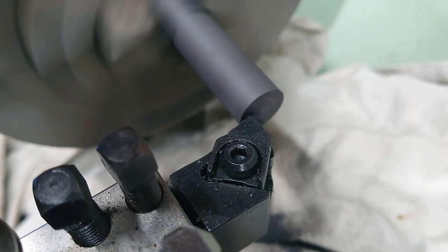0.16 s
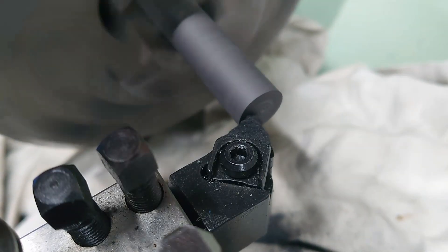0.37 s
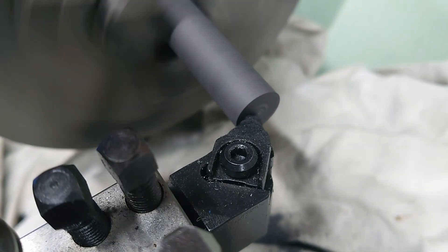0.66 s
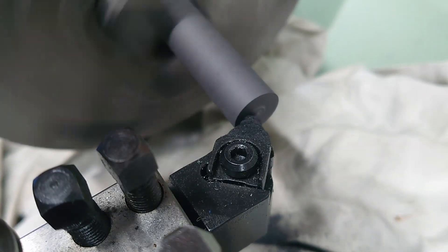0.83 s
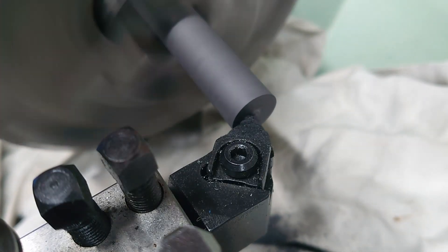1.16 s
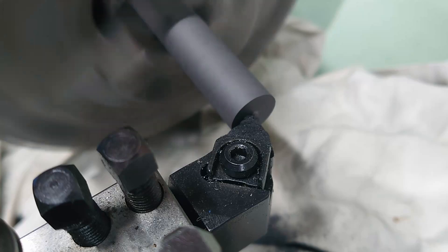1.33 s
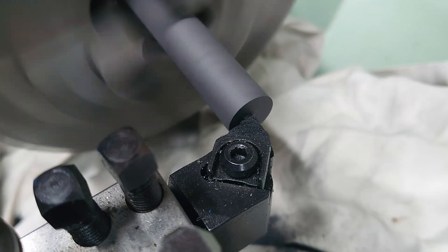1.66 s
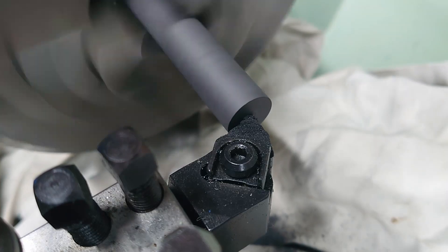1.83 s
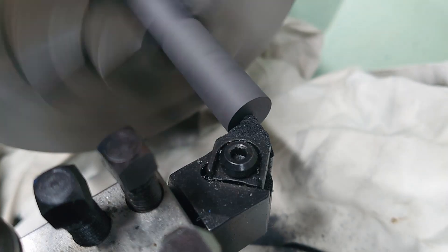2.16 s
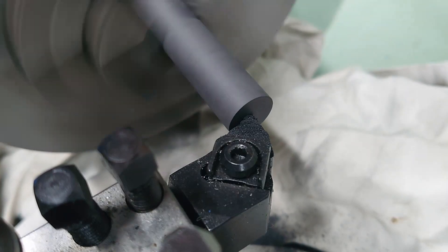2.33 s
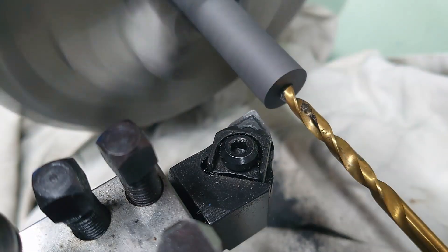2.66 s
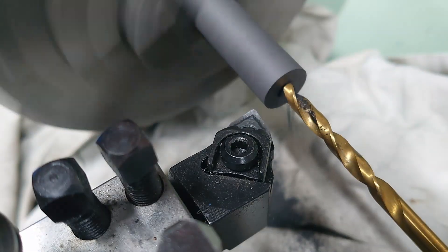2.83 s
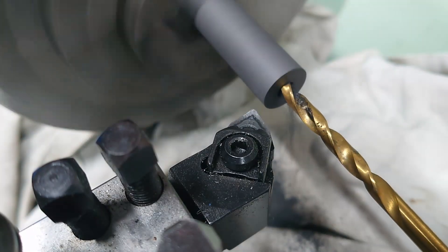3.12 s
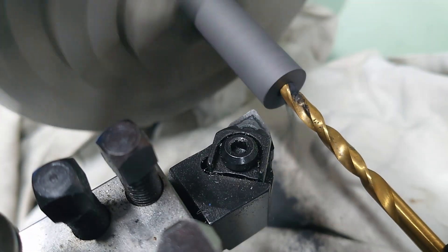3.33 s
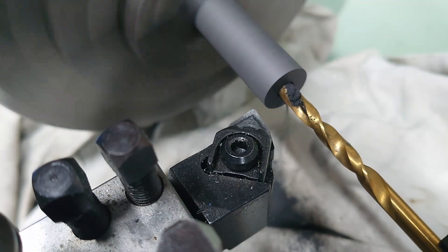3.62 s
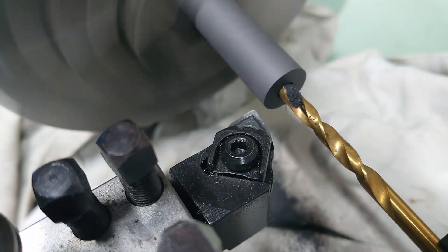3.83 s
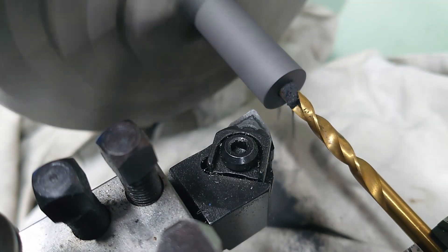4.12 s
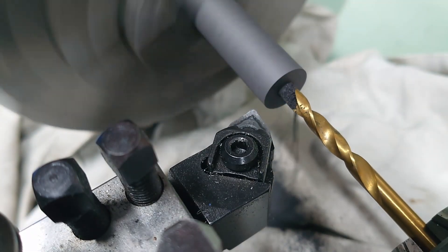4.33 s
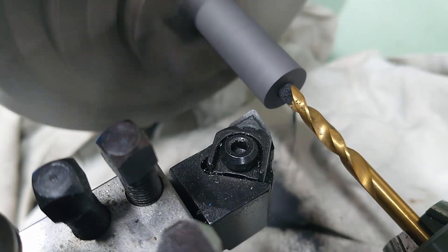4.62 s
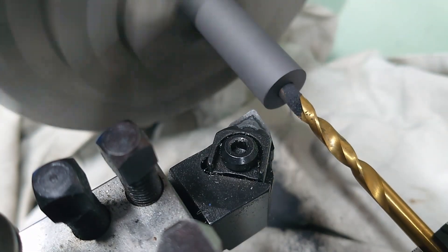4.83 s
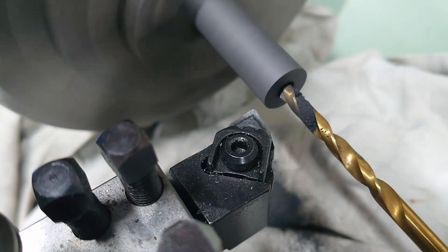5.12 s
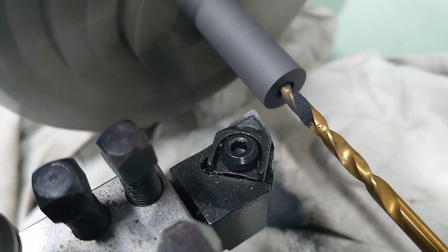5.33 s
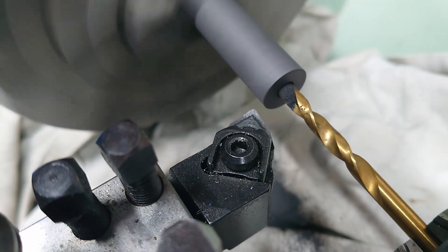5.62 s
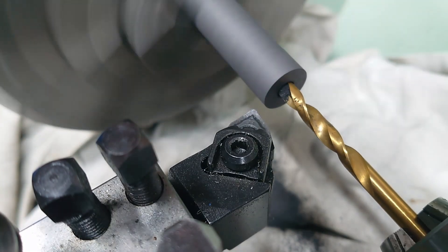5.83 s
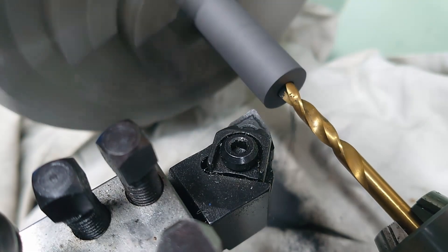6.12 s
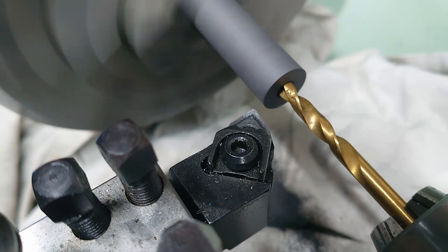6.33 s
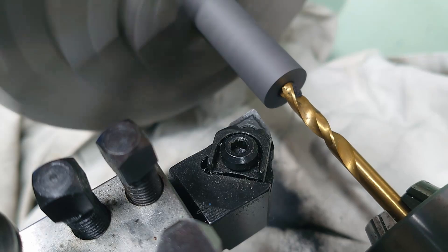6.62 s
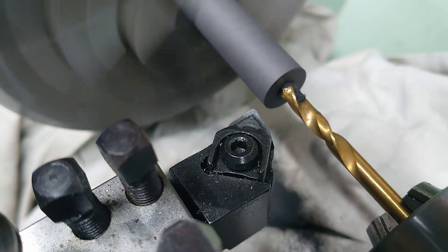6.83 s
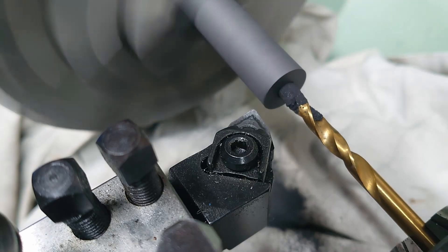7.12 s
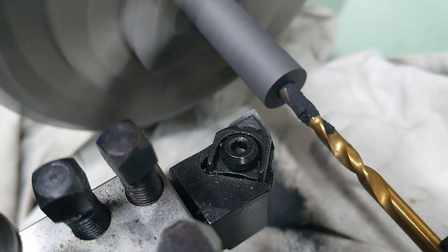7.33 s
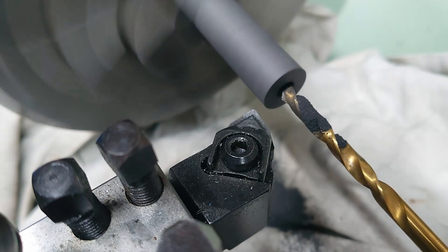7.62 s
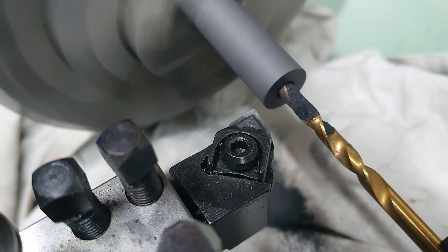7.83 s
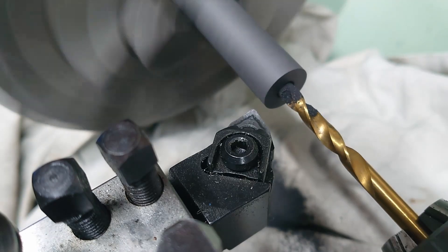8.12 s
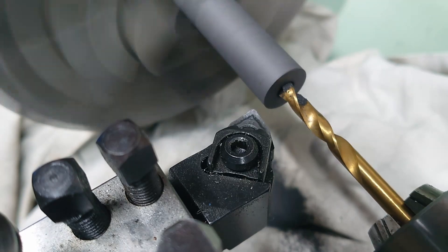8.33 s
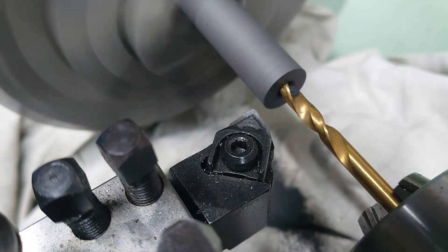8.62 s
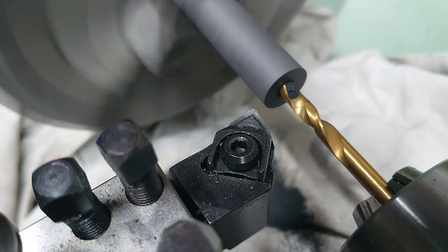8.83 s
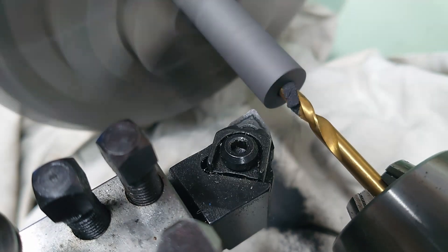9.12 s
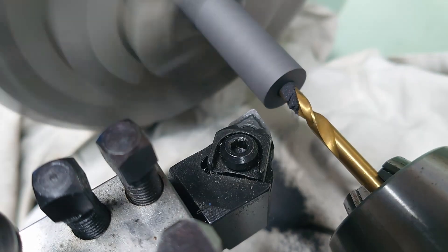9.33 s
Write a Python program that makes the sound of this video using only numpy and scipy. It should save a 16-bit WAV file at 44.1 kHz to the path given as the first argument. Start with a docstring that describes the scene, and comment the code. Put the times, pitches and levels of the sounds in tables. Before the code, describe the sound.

Close stereo sound of a bench lathe: first a firm mid-pitched whine, throbbing noise and a fluttering metallic rasp from facing a rod, fading as the cut shrinks. Around two and a half seconds the motor revs up, heard a little further away. Rougher whirring, casing rumble and airy hiss continue under short, very high drill squeaks, dry chip snaps and light crackle, still running at the end.

```python
"""On a workbench, a small geared metal lathe is heard close in stereo, facing a rod and then drilling it.
First the gears whine on a steady note, built from tooth-contact tones, while noise and squeal swing with each cut.
Then, a little further off, the motor is turned up: a looser mesh tone joins casing-coloured rumble and hiss.
The drill squeaks in short swells of its high modes, and chips tick as bursts of slips ring short modes."""
import sys
import numpy as np
from scipy import signal
from scipy.fft import rfft, irfft, next_fast_len
from scipy.io import wavfile

SR = 44100
rng = np.random.default_rng(int(sys.argv[2]) if len(sys.argv) > 2 else 0)


def materialize(psi):
    """Save the field psi as 16-bit PCM at rate SR to the path in sys.argv[1].

    A 1-D psi becomes a single channel; in a 2-D psi each row is a channel.
    """
    bounded = np.clip(np.atleast_2d(psi).T, -1, 1)
    quanta = np.round(bounded * 32767).astype(np.int16)
    wavfile.write(sys.argv[1], SR, quanta)


N = 417627
TIME = np.arange(N) / SR

# Motor speed as tooth contacts: (time [s], mesh rate [Hz])
MOTOR_SPEED = [(2.49, 695.85), (2.525, 716), (2.54, 845), (2.6, 850), (2.655, 930), (2.715, 955),
               (2.745, 1040), (2.95, 1048), (3.3, 1051.5), (9.47, 1054)]
# Slow gear tones: (times per pinion turn, times per wheel turn, level [dB], left-right [dB], left lead [rad])
SLOW_GEAR_TONES = [(1, 0, -24, 8, 2.1), (0, 3, -38, 20, 1.3), (0, 11, -31, -3, 0), (0, 13, -24, 1, 0),
                   (0, 14, -32, -2, -.7), (0, 20, -31, -9, .5), (0, 21, -29, -9, .2), (0, 22, -28, -4, 0),
                   (0, 24, -32, -7, .2), (0, 25, -26, -7, -.5), (0, 33, -27, -4, -.5), (23, 0, -17, -3, 0),
                   (0, 37, -24, -1, -.5), (24, 0, -14, -2, -.5), (0, 38, -24, -6, -.4), (25, 0, 0, -4, -.3),
                   (0, 40, -11, -2, -.3), (26, 0, -24, -4, 0), (0, 41, -17, -5, .3), (0, 42, -12, -11, -.9),
                   (0, 43, -26, -2, -1.7), (0, 49, -28, -2, -1), (0, 52, -26, -2, -1),
                   (50, 0, -18, -4, -1.8), (50, 1, -29, -2, -.4)]
# Fast gear tones: (spindle orders off the mesh, level [dB], left-right [dB], left lead [rad])
FAST_GEAR_TONES = [(-1, -10, -20, 1.2), (0, 0, -6, 2.3), (1, -15, 2, -2.3), (2, -15, 20, 1.8),
                   (4, -15, 15, 2.8), (-2, -16, -4, 2.8)]
# Mesh tone while drilling: (time [s], level [dB])
FAST_MESH_LEVEL = [(2.52, -55), (2.56, -41), (2.6, -28), (2.65, -35), (2.685, -37), (2.72, -34),
                   (2.755, -34.5), (2.82, -40), (2.89, -34.5), (3.0, -33), (3.7, -34.5), (4.8, -35.5),
                   (5.8, -38), (6.1, -41), (7.2, -40.5), (9.47, -40.5)]
# Casing resonances, silent below 0 dB: (centre [Hz], width [Hz], slow boost [dB], fast boost [dB])
CASING_MODES = [(215, 40.7, -1.5, 13.9), (393, 31.6, 7.5, 11), (540, 180, -2, 0.96), (690, 112, 10, 1.7),
                (740.3, 18.7, 14, 10.1), (865, 12, -12, 9.5), (980, 64, 0.5, 11.6), (1091, 68, 3.5, 17.1),
                (1172, 32, -1.5, 11.5), (1215, 20, 1, 8), (1272, 30, 4.5, 10.8), (1360, 65, 4.5, 0.63),
                (1630, 34, -2, 5.4), (2023, 16.8, 14, 12.8), (3514, 27, 8.5, 7.2), (3826, 22, 8, 6.8),
                (4070, 21, 7, 4), (4730, 27, 8, 9.5), (5800, 710, -4, 5.4), (6340, 225, 12, 6),
                (6760, 40, 15.5, 11.4), (7250, 110, -5, 4.5), (8200, 28, 4, 2.2), (9900, 78, -2, 1.7)]
# Noise colours of the slow running, the cut, the rumble, the hiss and the top hiss:
# (frequency [Hz], relative density [dB per Hz])
SLOW_COLOUR = [(30, -16), (70, -5), (120, -12), (200, 4.5), (500, -0.5), (1000, 2), (1700, -7.5),
               (2800, -9.5), (5000, -12.5), (7000, -14.5), (8300, -20), (10500, -13.5), (13000, -17),
               (16000, -22)]
RASP_COLOUR = [(400, -22), (900, -14), (1500, 0), (1850, 3), (2050, 8.5), (2300, -3), (3300, -3),
               (5000, -12.5), (8500, -19), (9350, -13), (9700, -1), (10050, -11), (10500, -6),
               (11000, -12.5), (15000, -39)]
RUMBLE_COLOUR = [(25, -6), (70, -1), (120, -2.5), (300, -0.5), (600, 6), (1200, 0), (1600, -4),
                 (2500, -4.5), (3200, -71)]
HISS_COLOUR = [(1800, -28), (2600, 0), (4000, 2.5), (5300, -3.5), (7000, 1), (8300, -6), (9500, -5.5),
               (11000, -12)]
TOP_COLOUR = [(7500, -18.5), (9000, -7), (10500, -2), (12000, -2), (14000, -6.5), (16000, -6)]
# Stereo width of the noise: (frequency [Hz], side over mid [dB])
SLOW_STEREO_WIDTH = [(60, -22), (110, -4), (200, -13), (380, -6.5), (700, -1), (1290, 1.5), (2380, -0.5),
                     (4400, 1), (8120, 0.5), (15000, -1)]
FAST_STEREO_WIDTH = [(60, 20.5), (110, -22), (200, -9.5), (380, -6.5), (700, -3.5), (1290, 0.5), (2380, -1),
                     (4400, 0), (8120, -1), (15000, 0)]
# Stereo balance of the noise: (frequency [Hz], left-right [dB])
SLOW_BALANCE = [(60, 8.5), (110, 4.5), (200, -1), (380, -2), (700, -5), (1290, 0.5), (2380, 4),
                (4400, -2.5), (8120, -12), (15000, 13.5)]
FAST_BALANCE = [(60, -0.5), (110, 3), (200, -2.5), (380, -5), (700, -3), (1290, -1.5), (2380, 0),
                (4400, -2), (8120, -3.5), (15000, 7.5)]
# Two strands of tool chatter that take turns:
# (pitch [Hz], swing [Hz], level over the rasp [dB], swell at the top of the turn [dB])
CHATTER_STRANDS = [(2040, 54, 0.5, 4.5), (1876, 40, -2, -4.5)]
# Rough notes either side of the mesh: (pitch [Hz], level [dB], left-right [dB], left lead [rad])
BORE_TONES = [(998, 0, 21, -1.3), (1074, -1, 0.5, 1.86)]
# High modes of the drill: (pitch [Hz])
DRILL_MODES = [9960, 10550, 11350]
# Drill margin rubbing the bore: (time [s], level [dB], centre [Hz], length [s])
DRILL_RUBS = [(3.693, -30.5, 11370, 0.03), (3.8853, -45, 10500, .04), (4.75, -29, 10830, 0.025),
              (4.82, -34.5, 10800, .038), (4.904, -36.5, 10500, .025), (5.051, -31.5, 10640, 0.03),
              (5.134, -29, 10800, 0.031), (5.357, -34, 10540, 0.033), (7.078, -25.5, 10900, 0.027),
              (7.1449, -41, 10600, .036), (7.2097, -39, 9750, 0.017), (7.327, -29, 10530, 0.027),
              (7.394, -31, 10900, 0.042), (7.675, -42, 10400, .025), (7.7365, -42, 10000, .025),
              (8.092, -44, 9900, .022), (8.1446, -47, 10500, .025), (9.439, -44, 10550, 0.02)]
# Chips snapping: (time [s], level [dB], centre [Hz])
CHIP_SNAPS = [(3.716, -43, 4450), (3.8851, -44, 3700), (4.8434, -37, 4300), (4.991, -35, 4300),
              (5.032, -41, 4700), (5.0784, -40, 4650), (5.2684, -46, 4300), (5.666, -43, 3800),
              (5.7483, -46, 4500), (5.8306, -44, 4600), (6.6069, -44, 5000), (7.0234, -36, 5000),
              (7.208, -39, 4500), (7.3065, -37, 6500), (7.309, -42, 3900), (7.3357, -36, 4600),
              (7.3906, -41, 4300), (7.414, -38, 4500), (7.4945, -37, 4500), (7.6785, -38, 4050),
              (7.927, -41, 4400), (7.932, -41, 5800), (8.0222, -44, 4200), (8.095, -39, 4600),
              (8.2701, -45, 3600), (8.3914, -46, 4200)]
# Short modes struck by a snap: (pitch [Hz], level [dB], decay by 60 dB [s])
SNAP_MODES = [(3940, 0.5, 0.031), (4050, 3, 0.023), (4520, 6.5, 0.018), (4960, 3, 0.016), (5660, 8, 0.015),
              (6740, 10, 0.011), (9800, 4, .006)]
# Packed flutes, small chips crackle; silent where the end precedes the start: (start [s], end [s])
PACKED_SPANS = [(4.75, 5.9), (6.95, 6.2)]
# Two duller knocks: (time [s], peak [dB])
DULL_KNOCKS = [(5.1432, -37), (5.3567, -34)]
# Thin notes that wander and break up while drilling: (pitch [Hz])
THIN_PITCHES = [220, 3521, 4735, 7825, 2022]
# The same notes: (wander [Hz], level [dB], flicker [dB], left-right [dB], left lead [rad])
THIN_MOTION = [(8.01, -47.5, 0.3, 0, -0.13), (20, -61, 5.5, 5, 1.4), (28, -62, 5.5, 10, 1.5),
               (6.6, -61, 3.5, 22, -.6), (10.6, -75, -1, -15, -0.2)]
# Top hiss: (time [s], level [dB])
TOP_HISS_LEVEL = [(2.41, -62), (2.75, -50), (3.4, -47.5), (3.7, -52), (4.5, -48.5), (5.3, -53),
                  (6.0, -51.5), (8, -54.5), (9.0, -52.5), (9.47, -54.5)]
# Rotor hum, rumble and bearing hiss, each one row:
# (full-speed level [dB], change when slow [dB], drift while drilling [dB per s])
HUM_LEVEL = (-39, -16, -0.44)
RUMBLE_LEVEL = (-38, -2.1, 0.11)
HISS_LEVEL = (-45, -4.5, -0.33)

PINION_TEETH, WHEEL_TEETH, SPINDLE_RATIO = 25, 39, 76   # the ratio is tooth contacts per spindle turn
SLOW_MESH_HZ, FAST_MESH_HZ, SPEED_WANDER_HZ = 695.85, 1050, 1.5   # the wander is that of full speed
CHANGE_S = 2.403   # from here on it is heard further off
SLOW_END = round(2.85 * SR)   # last sample of the slow whine
GEAR_DB, GEAR_FAR_DB, GEAR_FADE_DB = -29, -34, -40   # whine close up, further off, its loss by full speed
WEAK_PINION_TOOTH_S, WEAK_WHEEL_TOOTH_S = 1.5784, 1.606   # a moment when each worn tooth is in mesh
# where in the mesh cycle each worn tooth pushes; a half opposes the tone
PINION_ERROR_CYCLES, WHEEL_ERROR_CYCLES = .83, .63
FACING_TURN_HZ, SQUEAL_TOP_S, SQUEAL_ROUGH_HZ = 11.7, .01, 60   # rod turns, a top of the swing, pitch jitter
RUNNING_DB, RUNNING_DB_PER_S = -37.5, -0.28   # running noise while facing
# the cut shrinks towards the centre: dB lost after 1 s, ever faster
RASP_DB, RASP_FALL_DB, RASP_FALL_POWER = -40.5, -8, 1.93
# deep in the bore, and while speeding up, the tooth timing scatters
MESH_LOOSE_S, MESH_LOOSE_CYCLES, RUN_UP_LOOSE_CYCLES = 5.6, .3, .08
LEAN_DB, LEAN_DB_PER_S = -.5, -0.01   # left-right balance of the fast running
BORE_NOTE_DB, BORE_NOTE_FULL_S, BORE_NOTE_DB_PER_S = -42.5, 6.5, 2   # grow with depth, then hold
SQUEAK_DB_PER_KHZ = -17   # modes away from the centre sing less
SQUEAK_LEAN_DB, SQUEAK_LEAN_DB_PER_S = 4, -1.8   # left at first, drifting right as the drill goes in
TICK_LEAN_DB = -8
TICK_DB_PER_OCTAVE, TICK_SCATTER_DB = -13, 2   # modes off a snap's centre are struck less, and unevenly
SNAP_S, SNAP_LOW_HZ, CRACK_DB = 0.0003, 3200, -4   # slip decay, lowest sound, dry crack over the ring
CRACKLES_PER_S, CRACKLE_DB = 40, -53   # the level is that of the softest crackle
# rumble in this band wakes only as the mesh climbs into it: cut at low speed, rise by full speed
WHINE_BAND_HZ, WHINE_BAND_SLOW_DB, WHINE_BAND_RISE_DB = (900, 1300), -13.5, 9
# extra rumble just over the mesh, against the rumble in that band, fading as drilling goes on
UPPER_BAND_HZ, UPPER_BAND_DB, UPPER_BAND_DB_PER_S = (1115, 1190), 3, -2
THUD_S, THUD_DB, THUD_HZ, THUD_T60_S = 2.25, -35.5, 68.5, .2   # level before the fade
CUTOFF_HZ = 15760


def amp(db):
    """Turn dB into gain."""
    return 10 ** (np.asarray(db) / 20)


def in_time(rows):
    """Read a (time, value) curve sample by sample."""
    times, values = np.transpose(rows)
    return np.interp(TIME, times, values)


def at_hz(points, hz):
    """Read a spectrum on a log frequency axis."""
    points = np.array(points)
    return np.interp(np.log(hz), np.log(np.maximum(points[:, 0], 1)), points[:, 1])


def drift(rate):
    """Random wander of spread 1, twice smoothed at a rate in Hz."""
    step = 40   # samples between wander points
    r = np.exp(-2 * np.pi * rate * step / SR)
    noise = rng.standard_normal(N // step + 4002)
    slow = signal.lfilter([1], [1, -2 * r, r * r], noise)[4000:]
    return np.interp(np.arange(N) / step, np.arange(len(slow)), slow / slow.std())


def sides(pan_db):
    """Left and right gains of power 1 on average."""
    gains = amp(np.array([[.5], [-.5]]) * pan_db)
    return gains / np.sqrt(np.mean(gains ** 2, axis=0))


def tone(turns, level_db, pan_db, lead, start=None):
    """A sine of given rms that reaches the two channels with its own balance and lead."""
    start = rng.random() if start is None else start
    phase = 2 * np.pi * (turns + start) + lead * np.array([[.5], [-.5]])
    return np.sqrt(2) * amp(level_db) * sides(pan_db) * np.sin(phase)


def ring(clicks, hz, t60):
    """A damped resonator: a unit click sets a sine of height 1 ringing."""
    r, w = amp(-60 / (t60 * SR)), 2 * np.pi * hz / SR
    return signal.lfilter([0, np.sin(w)], [1, -2 * r * np.cos(w), r * r], clicks + 1e-18)


def bandpass(sound, band_hz):
    """Pick out a band without delay."""
    return signal.sosfiltfilt(signal.butter(2, band_hz, "band", fs=SR, output="sos"), sound)


def casing_noise(throb_db, colour, fast, resonant=True):
    """Throbbing friction noise coloured by a spectrum and the casing resonances; mid rms 1."""
    size = next_fast_len(N)
    hz = np.maximum(np.arange(size // 2 + 1) * SR / size, 1)
    power = 1
    if resonant:
        for centre, width, *boost_db in CASING_MODES:
            peak = amp(2 * max(boost_db[fast], 0)) - 1
            power = power + peak / (1 + ((hz - centre) / width) ** 2) ** 2
    throbbing = rng.standard_normal((2, N)) * amp(throb_db)
    mid, side = rfft(throbbing, size) * amp(at_hz(colour, hz)) * np.sqrt(power)
    side = side * amp(at_hz((SLOW_STEREO_WIDTH, FAST_STEREO_WIDTH)[fast], hz))
    lean = sides(at_hz((SLOW_BALANCE, FAST_BALANCE)[fast], hz))
    out = irfft(lean * np.array([mid + side, mid - side]), size)[:, :N]
    return out / np.std(out.mean(axis=0))


def slow_gears(mesh_turns, level_db, near):
    """Tooth contact and its sidebands: each wheel repeats its errors once a turn; the run-up shakes them loose."""
    shaken = np.clip((TIME - MOTOR_SPEED[1][0]) * 50, 0, 1)
    turns = (mesh_turns + .03 * drift(2.2) + .25 * drift(30) * shaken)[:SLOW_END]
    weak_pinion = WEAK_PINION_TOOTH_S * SLOW_MESH_HZ / PINION_TEETH
    weak_wheel = WEAK_WHEEL_TOOTH_S * SLOW_MESH_HZ / WHEEL_TEETH
    out = np.zeros((2, N))
    for p, w, db, pan, lead in SLOW_GEAR_TONES:
        order = p / PINION_TEETH + w / WHEEL_TEETH
        start = None
        # sidebands work against the mesh tone as a worn tooth passes, so the whine dips briefly
        if order == 1:
            start = 0
        elif abs(order - 1) < 1 / 5:
            if p:
                start = PINION_ERROR_CYCLES - (p - PINION_TEETH) * weak_pinion
            else:
                start = WHEEL_ERROR_CYCLES - (w - WHEEL_TEETH) * weak_wheel
        reach_db = -3.5 * (1 - near) * (order != 1)   # the weaker tones carry less further off
        tone_db = db + reach_db + 0.46 * drift(5.3)
        out[:, :SLOW_END] += tone(order * turns, tone_db[:SLOW_END], pan, lead, start)
    return amp(level_db) * out


def facing(mesh_turns):
    """Running noise beats with both wheels; the cut rasps and squeals, swinging once a turn of the rod."""
    noise_db = RUNNING_DB + RUNNING_DB_PER_S * TIME
    rasp_db = RASP_DB + RASP_FALL_DB * TIME ** RASP_FALL_POWER
    pinion_beat = 0.44 * np.sin(2 * np.pi * mesh_turns / PINION_TEETH)
    wheel_beat = 0.5 * np.sin(2 * np.pi * mesh_turns / WHEEL_TEETH)
    running = casing_noise(pinion_beat + wheel_beat + 1.18 * drift(36), SLOW_COLOUR, fast=0)
    bite = np.cos(2 * np.pi * FACING_TURN_HZ * (TIME - SQUEAL_TOP_S))
    squeal = 0
    for hz, swing_hz, db, swell_db in CHATTER_STRANDS:
        turns = np.cumsum(hz + swing_hz * bite + SQUEAL_ROUGH_HZ * drift(151)) / SR
        strand_db = db + swell_db * bite + 2.2 * drift(45) + 1.9 * drift(250)
        squeal = squeal + tone(turns, strand_db, 6.4, 2.1)
    rasp = casing_noise(1.6 * bite + 1.6 * drift(35), RASP_COLOUR, fast=0, resonant=False)
    return amp(noise_db) * running + amp(rasp_db) * (rasp + squeal)


def fast_gears(mesh_turns, effort):
    """A looser mesh tone with spindle sidebands, its tooth timing scattered."""
    deep = MESH_LOOSE_CYCLES * np.clip(TIME - MESH_LOOSE_S, 0, 1)
    run_up = RUN_UP_LOOSE_CYCLES * 4 * effort * (1 - effort)   # loosest halfway up to speed
    turns = mesh_turns + 0.13 * drift(4.5) + (deep + run_up) * drift(25)
    spindle = mesh_turns / SPINDLE_RATIO
    mesh = sum(tone(turns + k * spindle, db + 0.97 * drift(36), pan, lead)
               for k, db, pan, lead in FAST_GEAR_TONES)
    return amp(in_time(FAST_MESH_LEVEL)) * mesh


def bore_notes():
    """Rough, wandering notes either side of the mesh that grow as the drill goes in."""
    depth_db = BORE_NOTE_DB + BORE_NOTE_DB_PER_S * np.minimum(TIME - BORE_NOTE_FULL_S, 0)
    out = 0
    for hz, db, pan, lead in BORE_TONES:
        turns = np.cumsum(hz + 5 * drift(2.41) + 12 * drift(21.55)) / SR
        out = out + tone(turns, depth_db + db + 2.2 * drift(26), pan, lead)
    return out


def squeaks():
    """Each rub swells and fades, slightly rough, in the high modes of the drill nearest its centre."""
    out = np.zeros((2, N))
    lead = 0.78 * np.array([[1], [-1]])
    carriers = [np.sin(2 * np.pi * (hz * TIME + .25 * drift(60)) + lead) * amp(3.7 * drift(80))
                for hz in DRILL_MODES]
    for s, level_db, centre_hz, length in DRILL_RUBS:
        span = slice(round((s - .008) * SR), min(round((s - .008 + length) * SR), N))
        swell = np.sin(np.pi * (TIME[span] - s + 0.0067) / length) ** 2
        sung = sum(amp(SQUEAK_DB_PER_KHZ * abs(hz - centre_hz) / 1000) * carrier[:, span]
                   for hz, carrier in zip(DRILL_MODES, carriers))
        lean_db = SQUEAK_LEAN_DB + SQUEAK_LEAN_DB_PER_S * (s - DRILL_RUBS[0][0])
        out[:, span] += sides(lean_db) * amp(level_db) * swell * sung
    return out


def ticks():
    """Each chip snap is a quick run of slips that strikes the short modes nearest its centre."""
    packed = sum((TIME > start) & (TIME < end) for start, end in PACKED_SPANS)
    small_s = TIME[rng.random(N) < packed * CRACKLES_PER_S / SR]
    small_db = CRACKLE_DB + 3.0 * np.minimum(rng.exponential(1, len(small_s)), 2)
    small_hz = rng.uniform(3600, 6800, len(small_s))
    small = np.array([small_s, small_db, small_hz])
    s, level_db, centre_hz = np.hstack([np.transpose(CHIP_SNAPS), small])
    at, out = (s * SR).astype(int), np.zeros((2, N))
    slips = rng.standard_normal((len(s), 200)) * np.exp(-TIME[:200] / SNAP_S)
    slips[:, 0] = 4   # the first slip is hard
    slips /= np.sqrt(np.sum(slips ** 2, axis=1, keepdims=True))
    uneven_db = TICK_SCATTER_DB * rng.standard_normal((len(s), len(SNAP_MODES)))
    for (hz, db, t60), scatter_db in zip(SNAP_MODES, uneven_db.T):
        clicks = np.zeros((2, N))
        off_centre_db = TICK_DB_PER_OCTAVE * abs(np.log2(hz / centre_hz))
        strength = amp(level_db + db + scatter_db + off_centre_db)
        for i, (left, right), burst in zip(at, (sides(TICK_LEAN_DB) * strength).T, slips):
            clicks[0, i + 2:i + 202] += left * burst   # the right channel hears it two samples early
            clicks[1, i:i + 200] += right * burst
        out += ring(clicks, hz, t60) + amp(CRACK_DB) * clicks
    return signal.sosfilt(signal.butter(4, SNAP_LOW_HZ, "high", fs=SR, output="sos"), out)


def knocks():
    """Single clicks that set one duller mode ringing, in the middle of the stereo image."""
    clicks = np.zeros(N)
    for s, peak_db in DULL_KNOCKS:
        clicks[round(s * SR)] = amp(peak_db)
    return ring(clicks, 2010.0, 0.028)


def running_level(row, effort):
    """Gain of a running noise that follows motor speed and drifts while drilling."""
    full_db, slow_db, db_per_s = row
    return amp(full_db + slow_db * (1 - effort) + db_per_s * (TIME - CHANGE_S))


def rotor_hum(mesh_turns, effort):
    """Rotor unbalance hums once a pinion turn."""
    flicker = amp(1.3 * drift(9) + 1.5 * drift(25))
    hum = tone(mesh_turns / PINION_TEETH + .04 * drift(2.7), 0, 2.3, -2.66)
    return running_level(HUM_LEVEL, effort) * flicker * hum


def gear_rumble(spindle, effort):
    """Casing noise throbbing twice a spindle turn, its whine band waking with speed."""
    rumble = casing_noise(0.12 * np.sin(4 * np.pi * spindle) + 0.43 * drift(38), RUMBLE_COLOUR, fast=1)
    band = bandpass(rumble, WHINE_BAND_HZ)
    upper = bandpass(rumble, UPPER_BAND_HZ)
    upper_gain = amp(UPPER_BAND_DB + UPPER_BAND_DB_PER_S * (TIME - CHANGE_S))
    band_gain = amp(WHINE_BAND_SLOW_DB + WHINE_BAND_RISE_DB * effort ** 2)
    rumble = rumble - band + band_gain * (band + upper * upper_gain)
    return running_level(RUMBLE_LEVEL, effort) * rumble


def bearing_hiss(spindle, effort):
    """Bearing hiss and a top hiss throb once a spindle turn and share one flutter."""
    turn, flutter_db = np.sin(2 * np.pi * spindle), 1.15 * drift(42)
    hiss = casing_noise(0.21 * turn + flutter_db, HISS_COLOUR, fast=1)
    top = casing_noise(0.36 * turn + flutter_db, TOP_COLOUR, fast=1)
    return running_level(HISS_LEVEL, effort) * hiss, amp(in_time(TOP_HISS_LEVEL)) * top


def thin_notes(effort):
    """Thin sines whose pitch wanders and whose level flickers, coming up with motor speed."""
    out = 0
    for hz, (wander_hz, db, flicker_db, pan, lead) in zip(THIN_PITCHES, THIN_MOTION):
        turns = hz * TIME + np.cumsum(wander_hz * drift(10.47)) / SR
        out = out + tone(turns, db + flicker_db * drift(29), pan, lead)
    return out * effort


def fast_running(mesh_turns, effort):
    """The driven lathe while drilling: gears, bore notes, rumble and hiss lean together; the rest stay put."""
    spindle = mesh_turns / SPINDLE_RATIO
    hiss, top = bearing_hiss(spindle, effort)
    leaning = fast_gears(mesh_turns, effort) + bore_notes() + gear_rumble(spindle, effort) + hiss
    lean = sides(LEAN_DB + LEAN_DB_PER_S * (TIME - CHANGE_S))
    return lean * leaning + top + rotor_hum(mesh_turns, effort) + thin_notes(effort)


def thud():
    """A soft bump on the bench: a low, decaying sine with a rounded start."""
    after = np.maximum(TIME - THUD_S, 0)
    fade = amp(THUD_DB - 60 * after / THUD_T60_S)
    return fade * (1 - np.exp(-after / 0.014)) * np.sin(2 * np.pi * THUD_HZ * after)


def scene():
    """Facing close up, then drilling from further off."""
    mesh_hz = in_time(MOTOR_SPEED)
    effort = np.clip((mesh_hz - SLOW_MESH_HZ) / (FAST_MESH_HZ - SLOW_MESH_HZ), 0, 1)   # 0 slow, 1 full speed
    mesh_turns = np.cumsum(mesh_hz + SPEED_WANDER_HZ * effort * drift(1.49)) / SR
    near = np.clip((CHANGE_S - TIME) * 200 + .5, 0, 1)   # 1 close up, 0 further off
    far = 1 - near
    gear_db = near * GEAR_DB + far * (GEAR_FAR_DB + GEAR_FADE_DB * effort ** 2)
    whine = slow_gears(mesh_turns, gear_db, near) * (effort < 1)
    lathe = whine + near * facing(mesh_turns) + far * fast_running(mesh_turns, effort)
    return lathe + squeaks() + ticks() + knocks() + thud()


def record(dry):
    """A steep low-pass cuts the top."""
    return signal.sosfilt(signal.ellip(12, .5, 60, CUTOFF_HZ, fs=SR, output="sos"), dry)


dry = scene()
out = record(dry)
materialize(out)
```